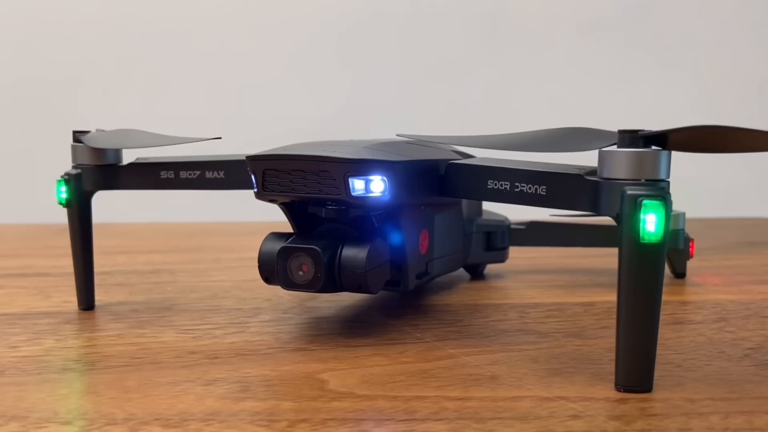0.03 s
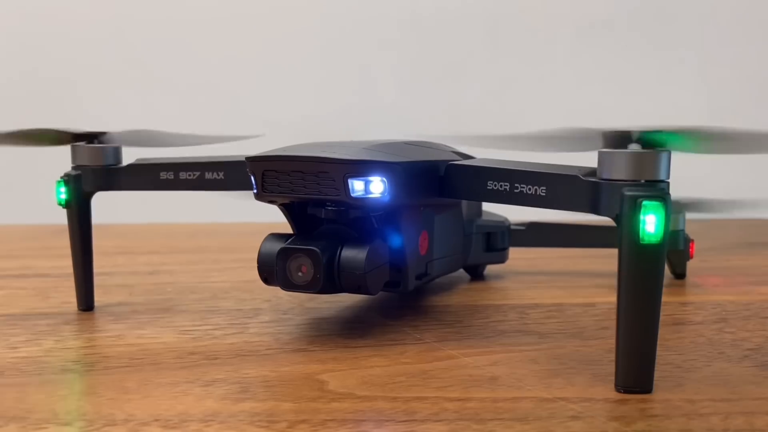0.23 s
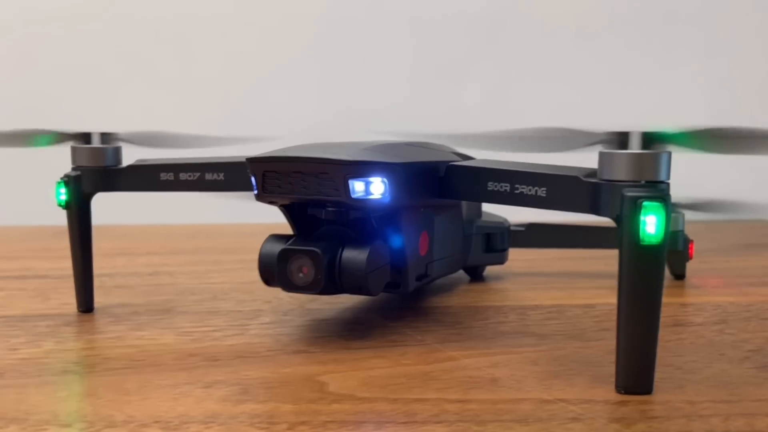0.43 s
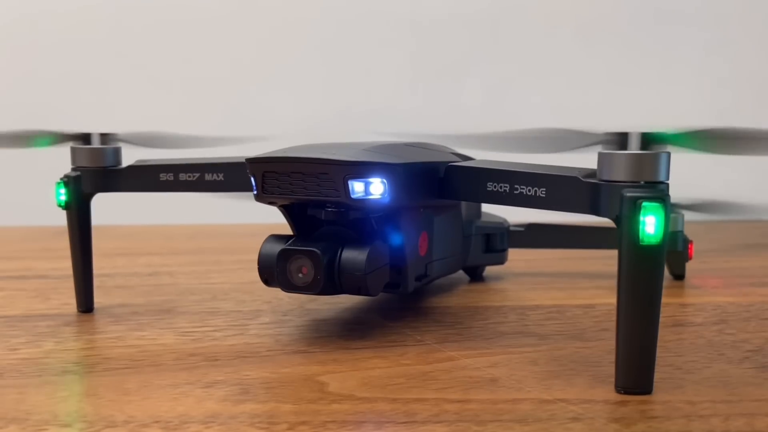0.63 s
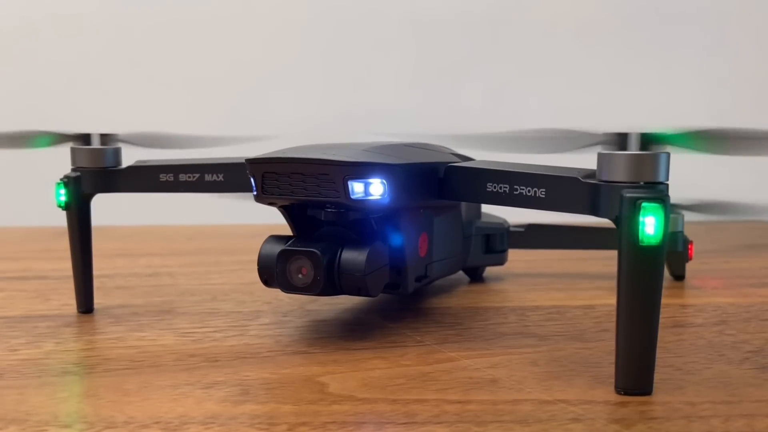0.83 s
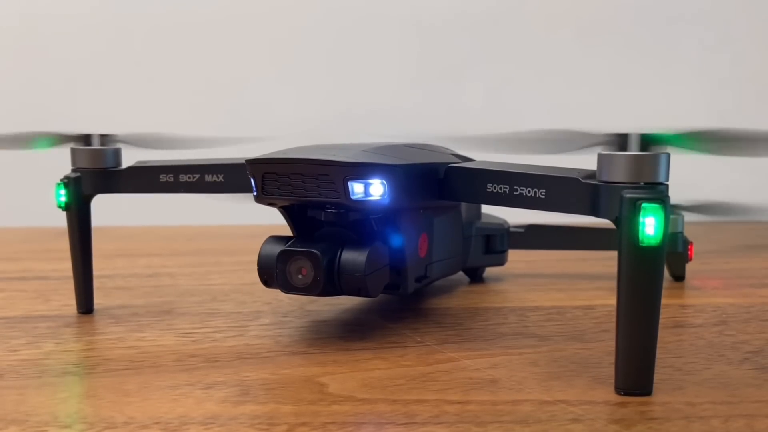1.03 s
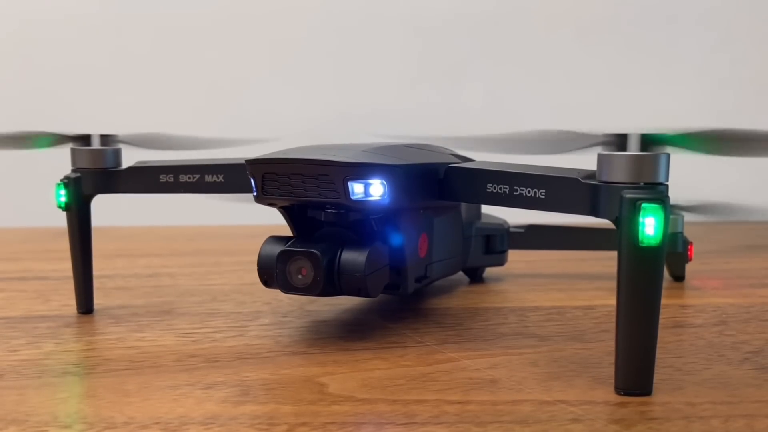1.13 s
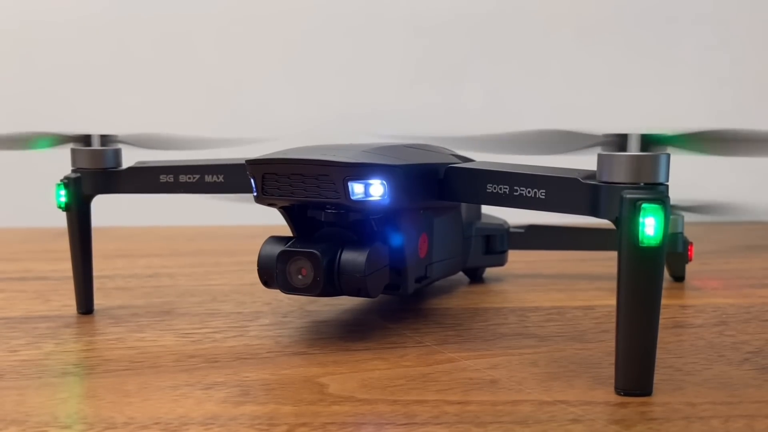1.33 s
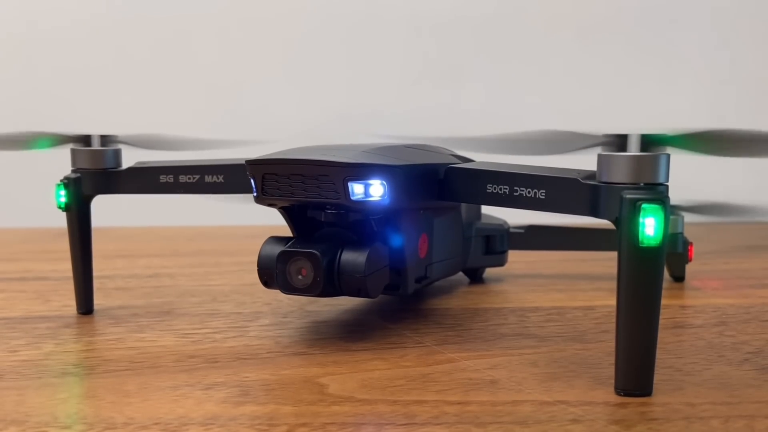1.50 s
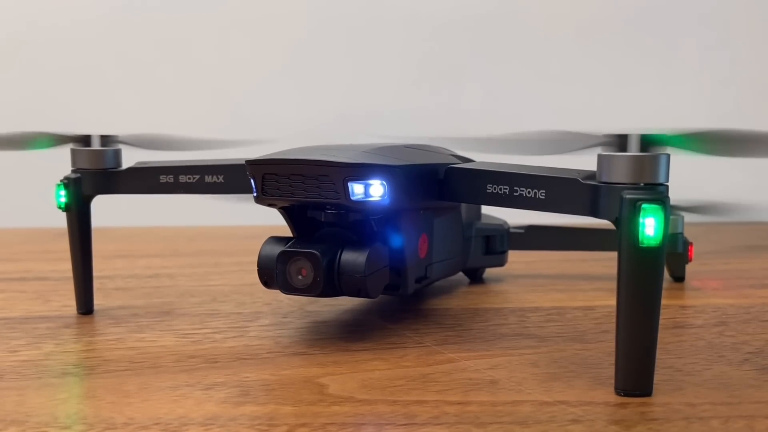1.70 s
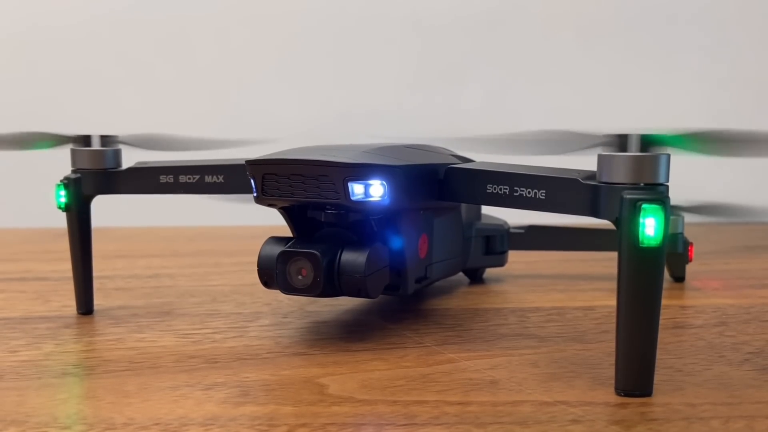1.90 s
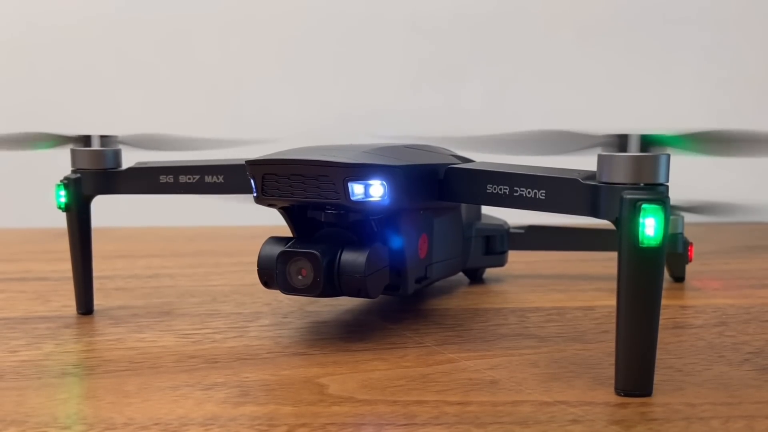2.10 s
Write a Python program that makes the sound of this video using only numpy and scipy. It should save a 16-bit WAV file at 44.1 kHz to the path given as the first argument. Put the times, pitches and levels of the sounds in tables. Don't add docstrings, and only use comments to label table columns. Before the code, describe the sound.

Small drone motors start on a table: blades snap, wind buffets, then a steady thin whine

```python
import sys
import numpy as np
from scipy import signal
from scipy.fft import rfft, irfft, next_fast_len
from scipy.io import wavfile
from scipy.ndimage import uniform_filter1d, map_coordinates

SR = 44100
rng = np.random.default_rng(int(sys.argv[2]) if len(sys.argv) > 2 else 0)


def store_wav(level_fs):
    pcm = np.round(np.clip(np.atleast_2d(level_fs), -1, 1) * 32767)
    wavfile.write(sys.argv[1], SR, pcm.T.astype(np.int16))


def convert_level_to_amplitude(level_db):
    exponent = np.asarray(level_db, float) / 20
    return 10 ** exponent


N = 94815
TIME_S = np.arange(N) / SR
HALF = np.array([[.5], [-.5]])


def unit(x):
    return x / np.sqrt(np.mean(x ** 2) + 1e-20)


def along(points, hz):
    f, v = np.transpose(points)
    return np.interp(np.log(hz + 1), np.log(f + 1), v)


def curve(rows, smooth_s):
    s, v = np.transpose(rows)
    return uniform_filter1d(np.interp(TIME_S, s, v), max(1, int(smooth_s * SR)))


def wobble(rate):
    knots = rng.standard_normal(int(N * rate / SR) + 4)
    return map_coordinates(knots, [np.arange(N) * rate / SR])


def filtered(x, response):
    m = next_fast_len(N + SR // 2)
    return irfft(rfft(x, m) * response(np.fft.rfftfreq(m, 1 / SR)), m)[..., :N]


# f/Hz, correlation/1
ALIKE = [(40, 0.98), (150, 0.9), (700, 0.68), (1300, 0.7), (2200, 0.38), (3300, 0.043), (5500, 0.78)]
# f/Hz, left-right level/dB
LEAN = [(200, -1), (700, 2), (1300, 4), (2200, -3.5), (4000, 9), (5600, 1)]
# f/Hz, phase/rad
TURN = [(100, 0.23), (1500, 0.51), (2500, 0.64), (4000, 0.1)]


def rush(spectrum, patchy_db):
    z = signal.stft(rng.standard_normal((2, N)), nperseg=512)[2]
    field = uniform_filter1d(uniform_filter1d(rng.standard_normal(z.shape[1:]), 5, 0), 8, 1)
    pair = signal.istft(z * convert_level_to_amplitude(patchy_db * unit(field)), nperseg=512)[1][:, :N]

    (low_hz, low_db), (high_hz, high_db) = spectrum[0], spectrum[-1]
    below = [(1, -120), (low_hz * .6, low_db - 30)]
    closed = below + list(spectrum) + [(high_hz * 1.6, high_db - 40)]

    def spread(hz):
        angle = np.arccos(np.clip(along(ALIKE, hz), -1, 1)) / 2
        return convert_level_to_amplitude(along(closed, hz)) * [np.cos(angle), np.sin(angle)]

    def placed(hz):
        return convert_level_to_amplitude(HALF * along(LEAN, hz)) * np.exp(1j * HALF * along(TURN, hz))

    mid, side = filtered(pair, spread)
    return unit(filtered(np.array([mid + side, mid - side]), placed))


# f/Hz, level/dB per Hz
ROOM = [(30, -27), (70, -12), (300, -1.5), (1000, -13), (1800, -26), (5000, -39)]


def room():
    return convert_level_to_amplitude(-55) * rush(ROOM, patchy_db=1)


# t/s, peak level/dB
SNAPS = [
    (0.048, -27),
    (0.058, -15),
    (0.07, -1),
    (0.079, -14),
    (0.086, -3),
    (0.089, -4),
    (0.099, -17),
    (0.113, -7),
    (0.187, -26),
]
# f/Hz, width/Hz, level/dB
FRAME = [(600, 153, -2.5), (990, 94, 6), (1437, 170, 6), (1930, 190, 4.5), (2650, 370, -7),
         (4280, 1000, -6), (6050, 1500, -20)]


def snaps():
    crack_t60_s, rattle_t60_s, room_t60_s, rise_s = .016, .15, .6, .0006
    t, drive = np.arange(SR // 5) / SR, np.zeros((2, N))
    crack = convert_level_to_amplitude(-60 * t / crack_t60_s)
    rattle = convert_level_to_amplitude(-17 - 60 * t / rattle_t60_s)
    tail = convert_level_to_amplitude(-25 - 60 * t / room_t60_s) * np.cos(np.pi / 2 * t / t[-1])
    shape = (crack + rattle + tail) * (1 - np.exp(-t / rise_s))
    for s, db in SNAPS:
        noise = rng.standard_normal(len(t)) + 1.04 * rng.standard_normal((2, len(t)))
        start = round(s * SR)
        drive[:, start:start + len(t)] += convert_level_to_amplitude(db + 3) * shape * noise
    top_db = max(row[2] for row in FRAME)

    def arms(f):
        total = convert_level_to_amplitude(-23)
        for k, (centre, width, db) in enumerate(FRAME):
            ring = 1j * f * width / (centre * centre - f * f + 1j * f * width)
            total = total + (-1) ** k * convert_level_to_amplitude(db - top_db) * ring
        return total

    return filtered(drive, arms) * convert_level_to_amplitude([[1.5], [-1.5]])


# t/s, level/dB
WASH = [(.05, -58), (.08, -33.5), (.17, -37), (.19, -37), (.25, -24), (.318, -21), (.33, -15.5),
        (.385, -20.5), (.43, -21.5), (.5, -20), (.62, -11), (.75, -17), (.8, -22), (.83, -22), (.9, -31.5),
        (1.32, -41), (1.55, -41), (2.15, -47)]
# f/Hz, level/dB per Hz
RUMBLE = [(20, -32), (40, -46), (60, 12.5), (100, -0.5), (160, 5), (380, -1.5), (600, -11.5), (1500, -33.5)]
# f/Hz, level/dB per Hz
SOFT_RUMBLE = [(20, -51), (35, -15.5), (65, 1.5), (110, -5.5), (200, -11.5), (400, -13.5), (700, -34)]
# centre t/s, peak level/dB, f/Hz, half
POPS = [(0.328, -3.5, 298, 0.22), (0.333, -1, 138, 0.5), (0.353, -2, 266, 0.31), (0.357, -8.5, 104, 0.93),
        (0.364, -7.5, 228, 0.43), (0.369, -15, 53, 0.88), (0.382, -12, 131, 0.5), (0.467, -10.5, 161, 0.31),
        (0.495, -7, 216, 0.69), (0.514, -12, 65, 1), (0.529, -9, 130.5, 0.49), (0.541, -7.5, 112, 0.49),
        (0.55, -8.5, 135, 0.3), (0.558, -13, 262, 0.66), (0.565, -28, 110, 0.21), (0.581, -17.5, 214, 1),
        (0.594, -10.5, 374, 1), (0.607, -3.5, 360, 0.38), (0.607, -9, 153, 0.9), (0.613, -13, 62.6, 1),
        (0.629, -5.5, 184, 0.41), (0.635, -12, 132, 0.29), (0.643, -6.5, 435, 0.41),
        (0.646, -3.5, 226, 0.25), (0.666, -0.5, 384, 1), (0.675, -12.5, 75.5, 1), (0.679, 0.5, 473, 0.45),
        (0.693, -12, 110, 0.18), (0.701, -5.5, 313, 0.14), (0.707, -4.5, 131, 0.42),
        (0.708, -0.5, 382, 0.46), (0.719, -10.5, 90.5, 0.41), (0.733, -2.5, 367, 0.3),
        (0.739, -3.5, 156, 0.44), (0.76, -15, 55, 1), (0.803, -7, 112, 0.55), (0.802, 4.5, 273, 0.43),
        (0.845, -17, 424, 0.67), (0.873, -25, 90, 0.82), (0.964, -29, 92, 0.62), (0.993, -26, 78, 0.6),
        (1.044, -27, 77.5, 0.35), (1.089, -27.5, 96, 0.68), (1.17, -23, 81, 0.45), (1.254, -27, 132, 0.57),
        (1.303, -22, 93, 0.36), (1.5, -24.5, 111, 0.38), (1.512, -21.5, 132, 0.35),
        (0.34, -18.5, 500, 0.75), (.350, -16, 537, 0.96), (.373, -13.5, 503, 0.88),
         (0.397, -23, 446, 0.69), (.412, -40, 403, 0.46), (.491, -24, 444, 0.68), (.603, -21, 810, 1),
         (.618, -16.5, 580, 0.6), (0.627, -13.5, 510, 1), (.76, -28.5, 600, 0.99), (.787, -14.5, 455, 1),
         (.799, -10.5, 694, .6), (.868, -29.5, 600, .8), (1.047, -28.5, 444, 0.54),
         (1.169, -30.5, 296, 0.45), (1.206, -26.5, 243, 0.37), (1.296, -29.5, 289, 0.67),
         (1.31, -25, 403, 0.3), (1.403, -37, 246, 0.45), (1.495, -26, 350, 0.3), (1.635, -31.5, 205, 0.46),
         (1.686, -44, 397, 0.53), (1.737, -32, 200, 0.61)]


def lumps(rate):
    return convert_level_to_amplitude(1.2 * (wobble(rate) + 0.39 * wobble(3 * rate)))


def gusts():
    t, out = np.arange(-(SR // 16), SR // 16) / SR, np.zeros((2, N + SR))
    sides = np.array([[1], [-1]])
    events = POPS
    for (s, db, hz, half), (phase, pan) in zip(events, rng.standard_normal((len(events), 2))):
        u = t * hz / half
        cycles = hz * t - .12 * half * u * np.tanh(u / 2)
        wave = np.cos(2 * np.pi * cycles + phase) + convert_level_to_amplitude(-22) * np.sin(4 * np.pi * cycles)
        pan_db = .5 * pan + 1.2 * np.log2(hz / 100)
        pop = convert_level_to_amplitude(min(db, -2) + pan_db * sides) * np.exp(-u * u / 2) * wave
        out[:, round(s * SR) - len(t) // 2:][:, :len(t)] += pop
    return out[:, :N]


def downwash():
    wash_db = curve(WASH, 0.0039)
    hard = .5 + .5 * np.tanh((wash_db + 23) / 1.5)
    strong = unit(lumps(34.8) * rush(RUMBLE, patchy_db=-3.5))
    soft = unit(lumps(25.08) * rush(SOFT_RUMBLE, patchy_db=6.5))
    buffeting = convert_level_to_amplitude(wash_db - .5) * (hard * strong + (1 - hard) * soft)
    opened = np.clip((TIME_S - .048) / 0.0028, 0, 1)
    return opened * (buffeting + gusts())


# f/Hz, level/dB per Hz
GROWL = [(1200, -32), (1600, -12), (1900, 9), (2200, -6), (2800, -11)]


def growl():
    centre_s, wide_s = .206, .018
    swell = np.exp(-((TIME_S - centre_s) / wide_s) ** 2 / 2)
    return convert_level_to_amplitude(-31.5 + 2 * wobble(120)) * swell * rush(GROWL, patchy_db=1)


# t/s, f/Hz
SPEED = [(.186, 1884), (.218, 1780), (.24, 2490), (.287, 3280), (.33, 2635), (.364, 2287), (.415, 2193),
         (.484, 2310), (.55, 2727), (.626, 3322), (.688, 3847), (.752, 2790), (.838, 2254), (.936, 2096),
         (1.09, 1949), (1.3, 1906), (1.55, 1899), (2.15, 1911)]
COMMUTATION = 21


def running():
    return np.clip((TIME_S - SPEED[0][0]) / 0.00067, 0, 1)


def slowing(speed):
    return -np.gradient(np.log2(speed)) * SR


# t/s, level/dB
EFFORT = [(0.17, -38), (0.18, -36), (0.192, -28), (0.268, -26.5), (0.318, -34), (0.39, -38.5),
          (0.488, -39.5), (0.538, -33), (0.644, -30.5), (0.738, -38), (0.748, -35.5), (0.804, -44),
          (2.144, -47.5), (2.15, -61)]
# speed ratio/1, level/dB, left-right level/dB, left lag/s
MOTORS = [
    (.9708, 1, -1, .00003),
    (.9838, -2, 5, .00006),
    (1.0026, -2, 1, -.00004),
    (1.018, -5, 3, .00008),
]
ORDER = [7, 8, 15, 18, 21, 24, 25, 42, 63, 84]
ORDER_DB = [-5, -14, -19, -18, -1.5, -13.5, -12, -6, -9, -15]
CHARACTER_DB = [
    [-9, -8, -8, 0, 0, -6, -9, -9, -12, -9],
    [-9, -3, -8, -8, 0, 5, 0, 1, -2, -14],
    [0, 0, -2, -8, 0, -5, -9, -6, 1, 2],
    [-2, -6, -9, -8, 0, -5, -9, -8, -9, -12],
]


def motors():
    effort_db, out = curve(EFFORT, 0.0033), np.zeros((2, N))
    idle_db = np.median(effort_db)
    level = convert_level_to_amplitude(idle_db + .75 * (effort_db - idle_db))
    speed = curve(SPEED, .012)
    catching = np.exp(-np.abs(TIME_S - SPEED[0][0]) / .022)
    fast = np.log2(np.maximum(speed / speed[-1], 1))
    braking = np.clip(slowing(speed) / 3, 0, 1)
    for (ratio, db, pan_db, lag_s), own in zip(MOTORS, CHARACTER_DB):
        wander = .0005 * wobble(12.8)
        unsteady = .07 * catching * wobble(223.1) + .0035 * (fast + braking) * wobble(25)
        shaft_hz = ratio * speed / COMMUTATION * (1 + wander + unsteady)
        turns = np.cumsum(shaft_hz) / SR + rng.random()
        for k, order_db, own_db in zip(ORDER, ORDER_DB, own):
            gain_db = db + order_db + own_db * np.clip(1 - fast, 0, 1)
            gain_db = gain_db + 1.1 * (2.5 + fast + braking) * wobble(70)
            gain_db = gain_db - 6 * braking - fast * k / COMMUTATION
            if k == COMMUTATION:
                gain_db = gain_db + 3 * catching
            if k == 2 * COMMUTATION:
                gain_db = gain_db + 4 * fast
            if k % COMMUTATION > 0:
                gain_db = gain_db - 14 * fast
            angle = 2 * np.pi * k * (turns - HALF * lag_s * shaft_hz)
            out += convert_level_to_amplitude(gain_db) * convert_level_to_amplitude(HALF * pan_db) * np.sin(angle)
    return out * level * running()


# f/Hz, level/dB per Hz
HISS = [(300, -5), (700, -6), (2000, -4), (3000, -3.5), (5000, -10), (7500, -10.5), (11000, -6.5),
        (16500, -13.5)]
# f/Hz, level/dB per Hz
BODY = [(100, 23.5), (400, 3.5), (900, 1), (2200, -1), (4000, -37), (6000, -55)]


def propellers():
    effort_db = curve(EFFORT, 0.0013)
    turns = np.cumsum(curve(SPEED, 0.03)) / COMMUTATION / SR
    passes = [np.sin(4 * np.pi * (motor[0] * turns + rng.random())) for motor in MOTORS]
    chop = 1 + .056 * np.mean(passes, axis=0)
    hiss = convert_level_to_amplitude(effort_db - .5 + .8 * wobble(25)) * chop * rush(HISS, patchy_db=1)

    thinning = np.clip(slowing(curve(SPEED, .12)) / 1.5, 0, 1)
    airy = filtered(hiss, lambda hz: hz > 9200)
    hiss = hiss - (1 - convert_level_to_amplitude(-5.5 * thinning)) * airy

    body_db = -42 + 0.2 * (effort_db - effort_db[-1]) + 0.5 * wobble(25)
    body = convert_level_to_amplitude(body_db) * rush(BODY, patchy_db=1)
    return (hiss + body) * running()


def scene():
    return room() + snaps() + downwash() + growl() + motors() + propellers()


def roll_off(x):
    return signal.sosfilt(signal.butter(12, 16940, fs=SR, output="sos"), x)


# f/Hz, width/Hz, level/dB
PORT = (9200, 240, 15)


def record(dry):
    top_hz, knee, ceiling = 15800, 6, .87
    centre, width, db = PORT

    def high(hz):
        return np.clip((hz - 6100) / 500 + .5, 0, 1) * (hz < top_hz)

    def low(hz):
        return (1 - high(hz)) * (hz < top_hz)

    def ports(hz):
        lag = 2 * np.pi * (hz - 7060) / 4170
        stepped = lag - .43 * np.sin(2 * lag)
        resonance = 1 + convert_level_to_amplitude(db) / (1 + ((hz - centre) / width) ** 2 * 4)
        return high(hz) * resonance * np.exp(-1j * HALF * stepped)

    x = dry / (1 + np.abs(dry / ceiling) ** knee) ** (1 / knee)
    mix = filtered(x, low) + filtered(x[[0, 0]], ports)
    return roll_off(mix)


dry = scene()
out = record(dry)
store_wav(out)
```